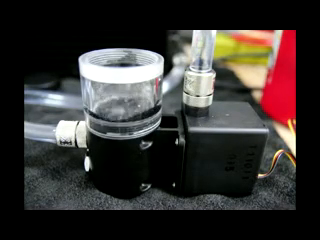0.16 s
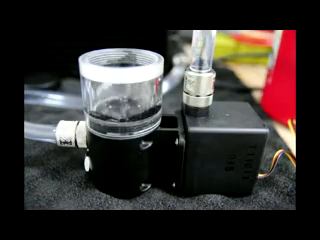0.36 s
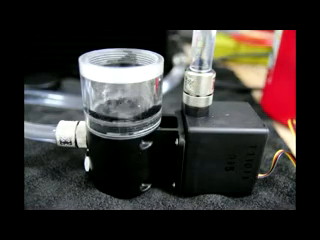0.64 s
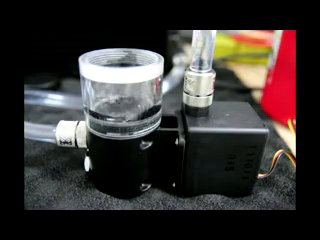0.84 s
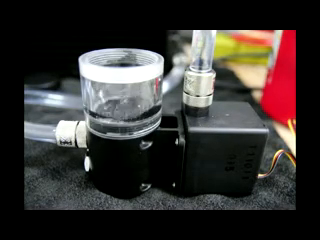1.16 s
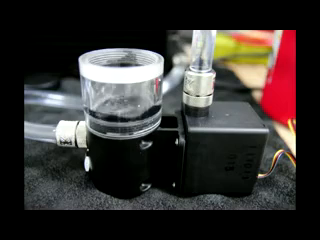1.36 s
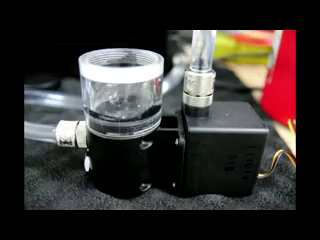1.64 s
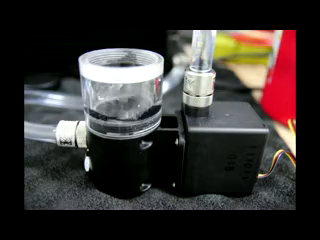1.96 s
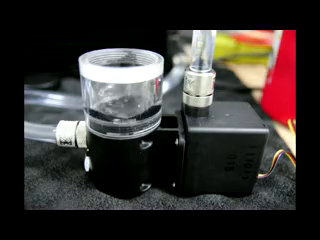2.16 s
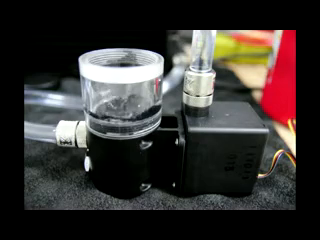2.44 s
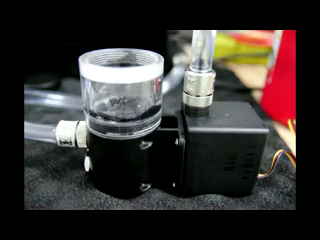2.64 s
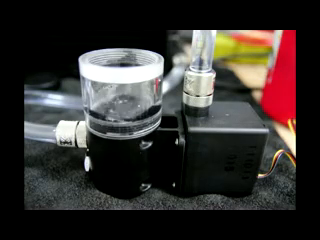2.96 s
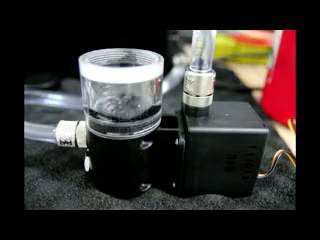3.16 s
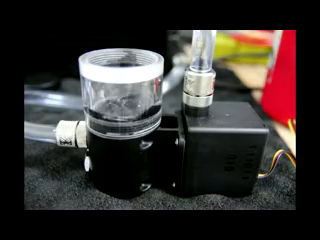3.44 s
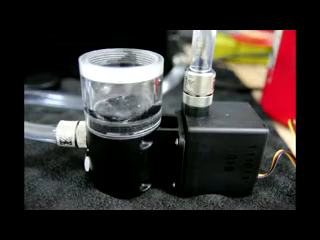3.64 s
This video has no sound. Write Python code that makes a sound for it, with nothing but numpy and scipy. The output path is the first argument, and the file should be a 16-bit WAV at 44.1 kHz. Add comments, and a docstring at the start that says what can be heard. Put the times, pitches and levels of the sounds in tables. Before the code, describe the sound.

A small electric water pump hums low and steadily over a muffled water rush, close up indoors. A bubble pings at once, more tick later; a very faint thin whine joins midway, with low fan tones behind.

```python
"""A bubble pings at once over the steady hum and rush of a small electric pump circulating cooling water indoors.
The hum is a harmonic series on the rotor's turning rate; the rush is filtered turbulence, chopped by the impeller.
More bubbles ring as decaying sines, a thin whine comes in from 1.45 s, and a fan adds low, nearly steady tones.
The recorder keeps every fourth sample, so spectral images mirror the treble faintly upward."""
import sys
import numpy as np
from scipy import signal
from scipy.fft import rfft, irfft, next_fast_len
from scipy.io import wavfile
from scipy.ndimage import uniform_filter1d

SR = 44100
rng = np.random.default_rng(int(sys.argv[2]) if len(sys.argv) > 2 else 0)


def master(y):
    """Save y as 16-bit WAV."""
    cut = np.clip(np.atleast_2d(y).T, -1, 1)
    pcm = np.round(cut * 32767)  # scale
    wavfile.write(sys.argv[1], SR, pcm.astype(np.int16))


N = 168021  # length in samples

# Rotor harmonics: multiple of the turning rate, level/dB
ROTOR_HARMONICS = [(1, -41.5), (3, -32.5), (4, -46.5), (5, -39), (6, -37), (7, -60.5), (8, -48.5),
                   (10, -54), (14, -53), (15, -55.5), (16, -61.5), (17, -57.5), (19, -58.5), (20, -51),
                   (21, -57), (23, -57), (26, -56.5), (30, -68), (31, -68), (33, -60.5), (34, -71.5),
                   (40, -65.5), (62, -68), (68, -76), (69, -72.5), (71, -70), (73, -73.5), (76, -82.5),
                   (82, -69.5)]
# Spectral density of the water's rush: f/Hz, level/dB (per Hz)
RUSH_SPECTRUM = [(12, -90), (24, -63.5), (45, -63.5), (130, -58), (260, -54.5), (400, -56), (530, -59.5),
                 (660, -64.5), (850, -67), (1030, -71), (1600, -72), (2050, -76), (2550, -76), (3100, -81),
                 (4000, -86), (5400, -91)]
# Resonances and notches of housing, reservoir and bench: f/Hz, width/Hz, lift/dB
HOUSING_RESONANCES = [(58.3, 16, 6.5), (72, 8.1, 8.5), (106.4, 23, 4.5), (158.6, 6.3, -8), (169, 9.1, 8),
                      (193, 13, 3), (250, 7, 4), (266, 7.9, -1), (326, 18, -3.5), (410, 10, -1),
                      (456, 26, 4), (504.7, 23.4, 8), (597, 8.5, -2.5), (698, 21, -8.5), (720, 71, 3),
                      (1103, 15, -3.5), (1121, 91, 4.5), (1310, 90, 1.5), (1534, 19, -4.5), (2980, 92, 1)]
# Brief swells of the rumble: t/s, centre f/Hz, lift/dB
RUMBLE_SWELLS = [(.34, 62.6, 11), (.69, 61, 9), (.78, 221, 2.5), (1.11, 474, 4), (1.48, 258, 4.5),
                 (1.82, 250, 1), (2.0, 63.2, 7), (2.539, 400, 3.5), (3.07, 62.7, 4)]
# Air bubbles: t/s, f/Hz, peak level/dB, time to fall 60 dB/s, share by which the pitch starts low
AIR_BUBBLES = [(0, 2886, -25.5, 0.069, 0.0054), (0.597, 3297, -33.5, 0.056, 0.11),
               (.799, 3630, -39, 0.042, 0.076), (0.821, 3140, -48, .02, 0.036),
               (1.833, 3240, -36, 0.011, 0.059), (2.282, 5160, -45, 0.053, .08),
               (2.482, 3340, -36, 0.02, .1), (2.504, 3220, -40, .025, 0.081),
               (2.514, 3750, -45, 0.032, 0.088), (2.683, 3560, -35, 0.029, 0.08)]
# Thin motor whines: start t/s, end t/s, f/Hz, level/dB
MOTOR_WHINES = [(1.45, 1.843, 5200, -78), (2.2, 3.12, 5120, -66.5), (2.4, 3.9, 4900, -65)]
# Steady tones of a fan in the room: f/Hz, level/dB, unsteadiness (phase/rad; half of it as amplitude share)
FAN_TONES = [(119.5, -50.5, 0.12), (242, -41, 0.2), (241.3, -39.5, 0.31)]
# Response of the recorder's smoothing filter: f/Hz, level/dB
SMOOTHING_RESPONSE = [(3800, 0), (4800, -1), (5500, -4), (6200, -10.5), (6850, -18.5), (7750, -30),
                      (8300, -37), (9100, -48), (9800, -64.5), (10600, -85), (13000, -91.5)]

SHAFT_HZ = 58.82  # turning rate
SPEED_DRIFT, DRIFT_HZ = 0.0003, 2.5  # share of the speed, and how fast it wanders
HARMONIC_FLUTTER, FLUTTER_HZ = 0.18, 17  # amplitude share and rate, from the load of the water
PATCHY_DB, SURGE_DB, SURGE_HZ = 1.0, -0.3, 22  # turbulence: local patches and shared surges
VANES, VANE_CHOP, TURN_CHOP = 3, 0.05, 0.047  # vane count; chop depths of the vanes and the turning rotor
SWELL_S, SWELL_OCTAVES = 0.048, 0.6  # half length and half width of a swell, to 1/e of its lift
BUBBLE_RISE_S, BUBBLE_SCOOP_S = 0.001, 0.0018  # onset, and time constant with which the pitch settles
BUBBLE_ROUGH, BUBBLE_ROUGH_HZ = 0.4, 200  # amplitude share and rate of the roughness
WHINE_FADE_S, WHINE_WAVER_HZ, WHINE_WAVER_RATE_HZ = 0.086, 5.4, 8  # fade, pitch deviation and its rate
HOLD = 4  # one sample in this many is kept
HISS_DB, EDGE_HZ = -87, 13100  # the recorder's own even hiss, and its band limit


def rotor(turns):
    """Harmonic series: periodic forces of the rotor radiate at multiples of its rate, shaken by the water."""
    out = np.zeros(N)
    for multiple, db in ROTOR_HARMONICS:
        flutter = 1 + HARMONIC_FLUTTER * wander(FLUTTER_HZ)
        out += tone(multiple * turns, db) * flutter
    return out


def water(turns):
    """Source and filter: patchy turbulence, amplitude-modulated by the impeller, is coloured by resonances."""
    hz, t, spectrum = signal.stft(rng.standard_normal(N), SR, nperseg=512, noverlap=384)
    patches = uniform_filter1d(rng.standard_normal(spectrum.shape), size=6, axis=0)  # over frequency
    patches = evened(uniform_filter1d(patches, size=9, axis=1))  # over time
    patchy = spectrum * amp(PATCHY_DB * patches + swells(hz, t))
    flow = signal.istft(patchy, nperseg=512, noverlap=384)[1][:N]

    vane_chop = VANE_CHOP * np.cos(2 * np.pi * VANES * turns)
    turn_chop = TURN_CHOP * np.cos(2 * np.pi * 2 * turns)  # twice per turn
    surges = amp(SURGE_DB * wander(SURGE_HZ))
    flow = evened(flow * (1 + vane_chop + turn_chop) * surges)

    f = np.fft.rfftfreq(N, 1 / SR)
    colour = read(RUSH_SPECTRUM, f)
    for centre, width, db in HOUSING_RESONANCES:
        colour = colour + db * np.exp(-2 * ((f - centre) / width) ** 2)
    return irfft(rfft(flow) * amp(colour), N) * np.sqrt(SR / 2)  # the root makes the levels dB per Hz


def swells(hz, t):
    """Spectral gain in dB: each swell is a Gaussian in log-frequency and in time."""
    octave = np.log2(hz + 1)[:, None]
    lift = np.zeros((len(hz), len(t)))
    for s, centre, db in RUMBLE_SWELLS:
        time_part = ((t - s) / SWELL_S) ** 2
        pitch_part = ((octave - np.log2(centre)) / SWELL_OCTAVES) ** 2
        lift += db * np.exp(-time_part - pitch_part)
    return lift


def bubble(hz, db, t60, scoop):
    """Damped oscillator: a slightly rough ring scoops up to its pitch and decays exponentially."""
    t = np.arange(0, t60, 1 / SR)
    pitch = hz * (1 - scoop * np.exp(-t / BUBBLE_SCOOP_S))
    turns = np.cumsum(pitch) / SR
    rough = 1 + BUBBLE_ROUGH * wander(BUBBLE_ROUGH_HZ)[:len(t)]
    rise = np.minimum(t / BUBBLE_RISE_S, 1)
    decay = amp(db - 60 * t / t60)
    return rise * decay * rough * np.sin(2 * np.pi * turns)


def air():
    """Superposition: the rings of single air bubbles in the reservoir add up."""
    out = np.zeros(N)
    for s, hz, db, t60, scoop in AIR_BUBBLES:
        add(out, s, bubble(hz, db, t60, scoop))
    return out


def whine():
    """Frequency modulation: thin motor tones waver randomly in pitch as they fade in and out."""
    t = np.arange(N) / SR
    out = np.zeros(N)
    for start, end, hz, db in MOTOR_WHINES:
        fade = np.clip(np.minimum(t - start, end - t) / WHINE_FADE_S, 0, 1)
        pitch = hz + WHINE_WAVER_HZ * wander(WHINE_WAVER_RATE_HZ)
        out += fade * tone(np.cumsum(pitch) / SR, db)
    return out


def fan():
    """Beats: low, nearly steady tones, two of them close in frequency, interfere."""
    t = np.arange(N) / SR
    out = np.zeros(N)
    for hz, db, shake in FAN_TONES:
        turns = hz * t + shake * wander(4.7) / (2 * np.pi)
        out += tone(turns, db) * (1 + shake / 2 * wander(4.1))
    return out


def amp(db):
    """Level law: decibels become an amplitude ratio."""
    return 10 ** (np.asarray(db) / 20)


def evened(x):
    """Normalization: scales a signal to rms 1."""
    return x / np.sqrt(np.mean(x ** 2) + 1e-20)


def read(points, hz):
    """Interpolation: reads a spectrum on a log-frequency axis."""
    f, value = np.transpose(points)
    return np.interp(np.log(hz + 1), np.log(f + 1), value)


def add(mix, s, sound):
    """Superposition: mixes a sound in at a time in seconds."""
    part = mix[max(round(s * SR), 0):][:len(sound)]
    part += sound[:len(part)]


def wander(hz):
    """Low-passed noise: random motion of rms 1, up to about the given rate."""
    size = next_fast_len(N)
    f = np.fft.rfftfreq(size, 1 / SR)
    lowpass = (f > 0) * np.exp(-(f / hz) ** 2)
    return evened(irfft(rfft(rng.standard_normal(size)) * lowpass, size)[:N])


def tone(turns, db):
    """Simple harmonic motion: a sine of the given rms level that starts anywhere in its cycle."""
    return np.sqrt(2) * amp(db) * np.sin(2 * np.pi * (turns + rng.random()))


def scene():
    """Common drive: one nearly constant shaft speed sets both the hum and the chopping of the flow."""
    speed = SHAFT_HZ * (1 + SPEED_DRIFT * wander(DRIFT_HZ))
    turns = np.cumsum(speed) / SR
    return (rotor(turns) + water(turns) + air() + whine() + fan())[None]


def record(dry):
    """Sampling and imaging: gentle smoothing lets mirrored treble through; then hiss and the band limit."""
    size = 2 * N
    f = np.fft.rfftfreq(size, 1 / SR)
    limited = irfft(rfft(dry, size) * (f < SR / HOLD / 2), size)
    sampled = limited * HOLD * (np.arange(size) % HOLD == 0)  # zeros between the kept samples
    smoothed = irfft(rfft(sampled) * amp(read(SMOOTHING_RESPONSE, f)), size)
    hissy = smoothed + amp(HISS_DB) * rng.standard_normal(size)
    band_limit = signal.firwin(511, EDGE_HZ, window=("kaiser", 9), fs=SR)[None]
    return signal.oaconvolve(hissy, band_limit, "same")[:, :N]


dry = scene()
out = record(dry)
master(out)
```